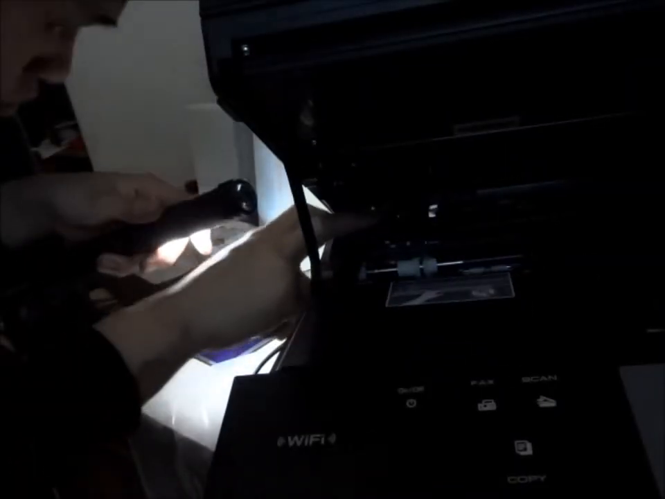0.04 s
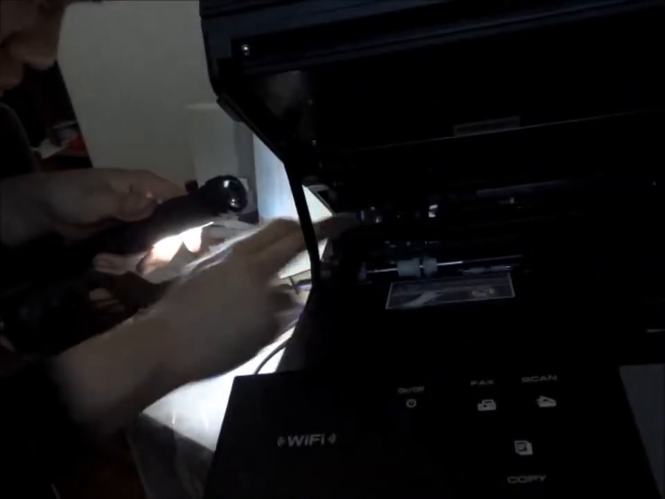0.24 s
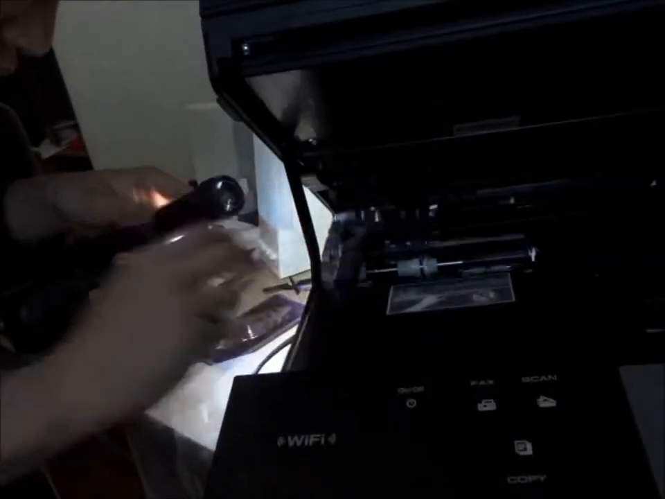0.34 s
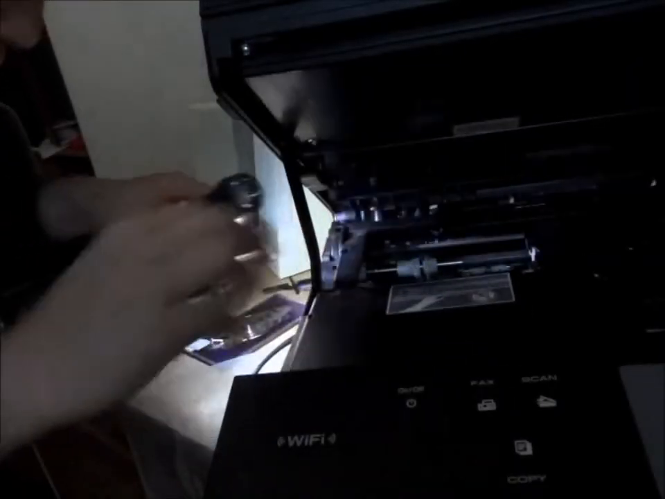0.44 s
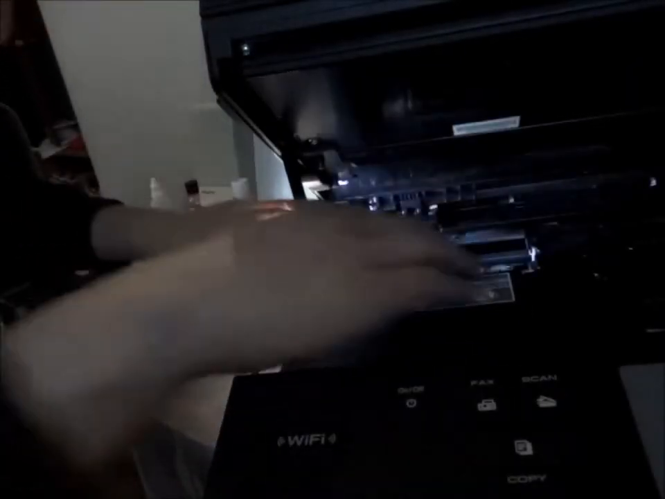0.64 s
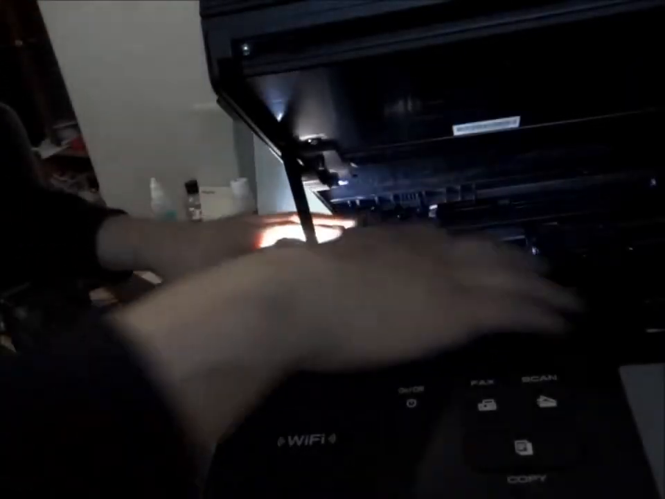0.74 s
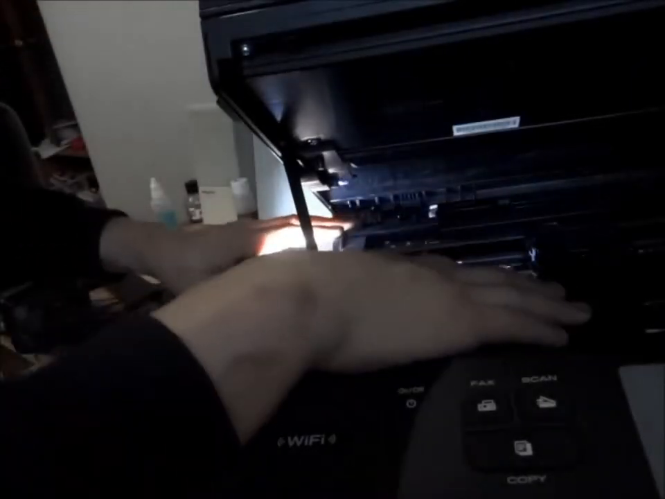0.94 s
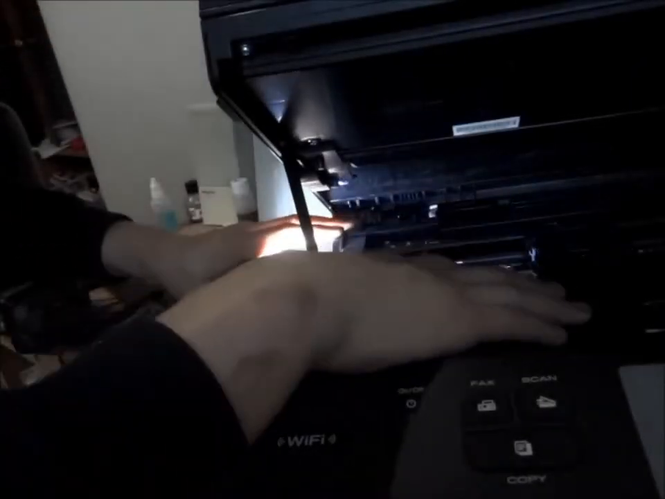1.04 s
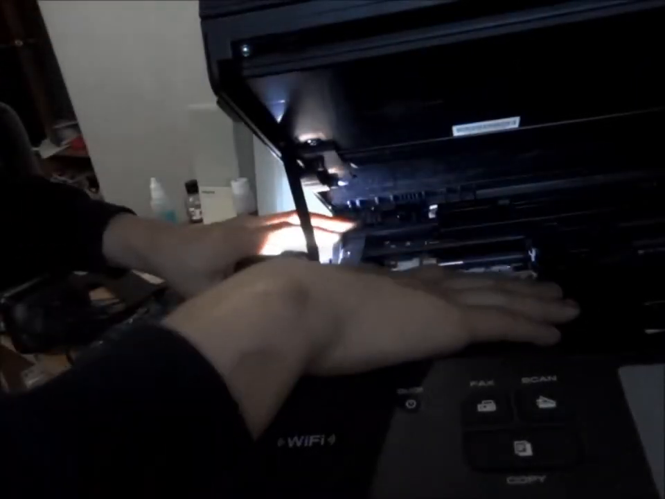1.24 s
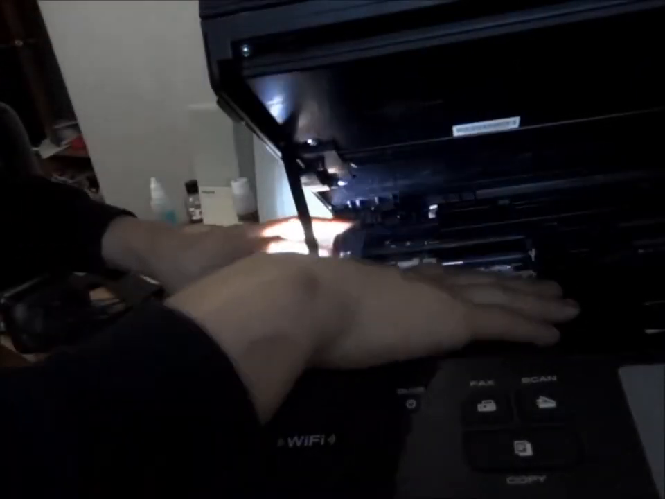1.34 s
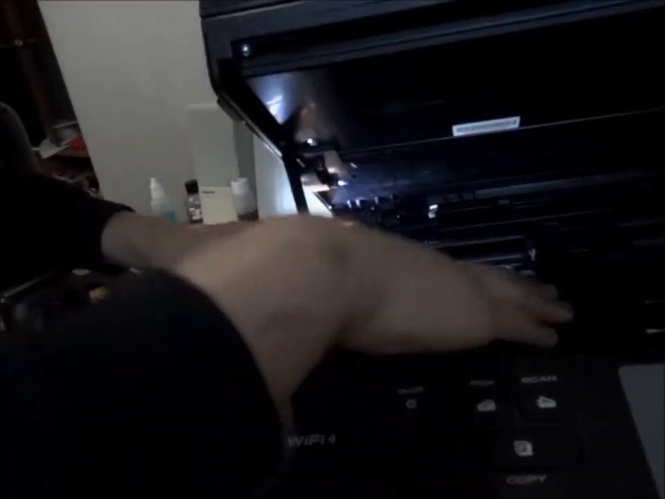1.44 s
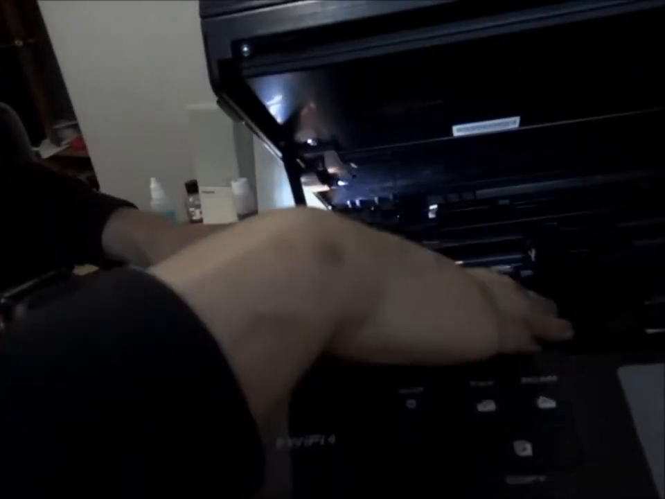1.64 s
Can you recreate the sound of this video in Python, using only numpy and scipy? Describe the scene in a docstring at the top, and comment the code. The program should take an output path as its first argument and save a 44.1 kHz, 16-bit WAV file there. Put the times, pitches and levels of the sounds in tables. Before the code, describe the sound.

Plastic parts clack and rattle as a hand works inside an open printer. A stiff catch snaps sharply, plastic rubs and taps, then a cover knocks shut. The sound is close, in a small quiet room.

```python
"""In a small quiet room, a hand works inside an open plastic printer, close by.
Over a faint low hum, plastic rubs on plastic in tiny slips. Parts tap and rattle,
and each hit rings the hollow housing. A stiff catch snaps home and a pressed panel shudders.
Near the end the cover shuts and a small loose part pings."""
import sys
import numpy as np
from scipy import signal
from scipy.fft import rfft, irfft, next_fast_len
from scipy.io import wavfile
from scipy.ndimage import uniform_filter1d

SR = 44100
rng = np.random.default_rng(int(sys.argv[2]) if len(sys.argv) > 2 else 0)


def generate_wav(sig):
    """Save sig (samples, or channels by samples) to the path in sys.argv[1] as 16-bit PCM at SR."""
    pcm = np.round(np.clip(np.atleast_2d(sig).T, -1, 1) * 32767).astype(np.int16)
    wavfile.write(sys.argv[1], SR, pcm)


N = 74970  # 1.7 s


def amp(db):
    """Turn decibels into a gain."""
    return 10 ** (np.asarray(db) / 20)


def unit(x):
    """Scale each row to an average power of 1."""
    return x / np.sqrt(np.mean(x ** 2, axis=-1, keepdims=True) + 1e-20)


def along(points, hz):
    """Read a curve of (frequency, value) points on a log frequency scale."""
    freqs, values = np.transpose(points)
    return np.interp(np.log(hz + 1), np.log(freqs + 1), values)


def filtered(x, response):
    """Turn each frequency up or down by the gain response(hz)."""
    n = x.shape[-1]
    padded = next_fast_len(n + SR // 4)
    return irfft(rfft(x, padded) * response(np.fft.rfftfreq(padded, 1 / SR)), padded)[..., :n]


def fade(t, ring_s):
    """Die away by 60 dB in ring_s, the ring time."""
    return np.exp(-np.log(1000) * t / np.maximum(ring_s, 1e-3))


def add(track, start_s, sound):
    """Mix a sound into the track at its start time."""
    part = track[max(round(start_s * SR), 0):][:len(sound)]
    part += sound[:len(part)]


# tone of the room's air (frequency [Hz], level [dB])
AIR_TONE = [(20, -14), (45, -5), (95, -3.5), (170, -8.5), (270, 2.5), (420, -10.5), (700, -10),
            (1300, -11.5), (2300, -17), (6000, -23), (11000, -26.5)]
def air_and_hum(hum_hz=99.2):
    """Still air and a faint hum, as mid (what both ears share) and side (how they differ)."""
    noise = rng.standard_normal((2, N))
    air_mid, air_side = amp(-60) * unit(filtered(noise, lambda hz: amp(along(AIR_TONE, hz))))
    hum = amp(-68.5) * np.sqrt(2) * np.sin(2 * np.pi * hum_hz * np.arange(N) / SR)
    return np.array([air_mid + hum, amp(-5) * air_side])


# tone of the plastic parts (frequency [Hz], level [dB])
PLASTIC_TONE = [(40, -53), (70, -13), (120, -9.5), (165, -21.5), (230, 0.5), (440, -2), (680, 0), (880, -3),
                (1030, -4.5), (1240, -1), (1580, -7.5), (1880, -4.5), (2190, -6.5), (2500, -2.5),
                (3150, -7.5), (4900, -10.5), (7000, -15), (11000, -17)]
def plastic_bands(hz, borders_hz=(192, 1180, 3900), lift_db=4, half_width_hz=8.3):
    """Gains of four bands, low to high: thump, knock, clack, tick. The housing lifts its own notes."""
    below = [1 / (1 + (hz / border) ** 8) for border in borders_hz]
    band_power = np.abs(np.diff([np.zeros_like(hz), *below, np.ones_like(hz)], axis=0))
    hollow = sum(1 / (1 + ((hz - note[0]) / half_width_hz) ** 2) for note in HOUSING_NOTES)
    return np.sqrt(band_power) * amp(along(PLASTIC_TONE, hz) + lift_db * hollow)


def plastic_noise():
    """The parts ring at so many pitches that they blur into noise, here in four equally strong bands."""
    return unit(filtered(rng.standard_normal((4, N)), plastic_bands))


def swell(peak_s, rise_s, fall_s):
    """A gain that climbs from -20 dB to full in rise_s and drops back in fall_s."""
    t = np.arange(N) / SR - peak_s
    return 10 ** -((t / np.where(t < 0, rise_s, fall_s)) ** 2)


# sliding strokes (peak time [s], rise [s], fall [s], thump [dB], knock [dB], clack [dB], tick [dB])
STROKES = [(0.011, 0.11, 0.078, -55, -57.5, -63.5, -60.5), (.205, 0.05, 0.062, -52, -62, -59, -52.5),
           (0.307, 0.065, 0.1, -46, -35.5, -58, -45.5), (0.433, 0.031, 0.068, -53, -49, -58, -67),
           (0.686, 0.04, 0.086, -66, -48.5, -46, -46.5), (0.776, 0.039, 0.066, -47.5, -43, -47, -45),
           (.842, 0.041, 0.11, -53, -48.5, -48.5, -50.5), (1.02, 0.39, 0.22, -59, -57.5, -64.5, -65),
           (1.205, 0.043, 0.034, -56.5, -46, -46.5, -53), (1.27, 0.094, 0.027, -51, -80, -57.5, -54.5),
           (1.35, 0.063, 0.026, -65, -41, -49.5, -63), (1.457, 0.17, 0.16, -77, -55, -51.5, -46.5),
           (1.64, 0.074, 0.13, -61, -57, -70, -93)]
def sliding(slips_per_s=500, slip_s=0.0042, slip_share=0.71):
    """Plastic rubs on plastic: swells of friction, made rough by tiny slips."""
    power = sum((amp(levels)[:, None] * swell(peak_s, rise_s, fall_s)) ** 2
                for peak_s, rise_s, fall_s, *levels in STROKES)
    slips = (rng.random(N) < slips_per_s / SR) * rng.exponential(size=N)
    grain = signal.lfilter([1], [1, -np.exp(-1 / (slip_s * SR))], slips)  # each slip dies away
    roughness = 1 - slip_share + slip_share * grain / grain.mean()
    return np.sum(plastic_noise() * np.sqrt(power * roughness), axis=0)


def burst(noise, shape, even_hz=450):
    """Shaped noise, evened out: a blow stirs all pitches alike, so only the plastic sets the tone."""
    n = shape.shape[-1]
    hz = np.fft.rfftfreq(n, 1 / SR)

    def smooth_power(spectrum):
        return np.abs(uniform_filter1d(np.abs(spectrum) ** 2, int(even_hz / hz[1]) + 1)) + 1e-12

    gain = np.sqrt(smooth_power(plastic_bands(hz)) / smooth_power(rfft(noise * shape)))
    even = irfft(rfft(noise) * gain, n)
    return unit(even * shape) * np.sqrt(np.mean(shape ** 2, axis=1, keepdims=True))


def ring(t, notes, attack_s):
    """A part struck at a random spot rings with fading notes, a little different each time."""
    tones = sum(amp(db + rng.normal(0, 1.1)) * fade(t, ring_s)
                * np.sin(2 * np.pi * (hz * t + rng.random())) for hz, db, ring_s in notes)
    return tones * (1 - np.exp(-t / attack_s))


def strike(hits, body_notes, clack_from_hz=1180):
    """Each hit is a burst of noise whose highs die first, plus the notes of the struck body."""
    out, t = np.zeros(N), np.arange(SR // 4) / SR
    noise = plastic_noise()
    band_ring_s = np.c_[[0.23, 0.059, 0.051, 0.03]]  # thump, knock, clack, tick
    band_slowness = np.c_[[4.3, 0.49, 0.32, 0.35]]  # the low bands start more slowly
    for start_s, knock, clack, tick, stretch, attack_s in hits:
        shape = (1 - np.exp(-t / (attack_s * band_slowness))) * fade(t, stretch * band_ring_s)
        shape /= shape.max(axis=1, keepdims=True)
        offset = rng.integers(N - len(t))
        bands = burst(noise[:, offset:offset + len(t)], shape)
        notes = [(hz, db + (knock if hz < clack_from_hz else clack), ring_s)
                 for hz, db, ring_s in body_notes]
        thump = knock - 38  # dB
        add(out, start_s, amp([thump, knock, clack, tick]) @ bands + ring(t, notes, attack_s))
    return out


# parts hitting (time [s], knock [dB], clack [dB], tick [dB], ring stretch [factor], base attack [s])
TAPS = [(0.019, -58.5, -49.5, -45.5, 2.74, 0.00022), (0.127, -48, -60, -54, 0.44, 0.0042),
        (.140, -44, -51.5, -51, 1.17, 0.00021), (.177, -46.5, -48, -72, 0.62, 0.0013),
        (0.187, -50, -51.5, -56, 1.8, 0.0011), (.242, -47, -44, -35.5, 0.96, 0.0014),
        (0.2472, -34.5, -28.5, -25, 1.7, 0.00098), (0.255, -29.5, -43, -42, 1.56, 0.00063),
        (0.2738, -37, -34, -28, 1.8, 0.0029), (.2868, -27.5, -23.5, -28.5, 0.94, 0.00089),
        (.2957, -35, -41.5, -25.5, 1.55, 0.00058), (.303, -28.5, -31, -42, 0.95, 0.00033),
        (0.3082, -33, -36, -30, 0.88, 0.00071), (.319, -30.5, -38, -31, 1.1, 0.00061),
        (.3245, -53, -35, -35, 1, 0.0011), (0.3593, -44, -30.5, -34.5, 1.3, 0.0017),
        (.370, -38, -35.5, -41, 0.61, 0.00049), (.438, -52, -46.5, -54, 1.1, 0.0016),
        (0.618, -84, -66, -51.5, 3.9, 0.0016), (.721, -41.5, -39.5, -37.5, 1.9, 0.0074),
        (.742, -37.5, -44.5, -62, 0.76, 0.0035), (0.7662, -39, -38, -30.5, 0.86, 0.0055),
        (.800, -43.5, -38, -39, 1.4, 0.012), (0.874, -46.5, -48, -42.5, 1.3, 0.0036),
        (0.881, -40, -39, -31, 0.8, 0.00089), (.8838, -50, -39, -28.5, 0.9, 0.00091),
        (.889, -48, -63, -39.5, 2, 0.0015), (.955, -43.5, -42, -40.5, 1.57, 0.002),
        (.982, -40.5, -56, -63, 0.53, 0.0034), (1.048, -79, -48.5, -44, 1.46, 0.0012),
        (1.126, -39.5, -45.5, -53, 1.43, 0.0073), (1.152, -45, -49, -59, 0.51, 0.00047),
        (1.205, -42, -54, -40.5, 0.75, 0.0011), (1.221, -44, -49, -61, 1.8, 0.0017),
        (1.297, -45, -54, -70, 2.3, 0.0044), (1.308, -37, -40.5, -50.5, 1.2, 0.0028),
        (1.347, -45, -68, -53, 2.3, 0.0021), (1.459, -45, -75, -55, 1.5, 0.0025),
        (1.5235, -39, -50, -63, 0.66, 0.0007), (1.558, -43.5, -54, -62, 0.74, 0.0024),
        (1.6075, -72, -52, -57, 0.44, .0004), (1.621, -52, -48.5, -66.5, 1.4, 0.0044)]
# notes the housing rings at (pitch [Hz], level against the hit [dB], ring time [s])
HOUSING_NOTES = [(222.3, -22.5, 0.2), (358.5, -15.5, 0.23), (521.7, -15.5, 0.23), (629, -26, 0.17),
                 (677, -5.5, 0.098), (785, -21, 0.13), (1014, -6, 0.066), (1227.6, -4.5, 0.089),
                 (1914, -14, 0.065), (2476, -3, 0.052), (2737, 0, 0.032), (3530, -5.5, 0.041)]
def tapping():
    """Parts tap and rattle, ringing the hollow housing."""
    return strike(TAPS, HOUSING_NOTES)


# the catch slips, then snaps home (time [s], level [dB])
CRACKS = [(0.65, -31.5), (.6541, -19)]
# tone of a crack (frequency [Hz], level [dB])
CRACK_TONE = [(380, -36), (540, -2), (1000, -17), (1300, -0.5), (2000, -8), (2650, 0.5), (3800, -6.5),
              (4800, 1), (7500, -9.5), (11000, -5)]
# notes the catch rings at (pitch [Hz], level [dB], ring time [s])
CATCH_NOTES = [(537, -36, 0.14), (985, -34, 0.1), (1298, -30, 0.1), (2626, -24, 0.042),
               (3240, -30.5, 0.054), (4660, -37, 0.1), (5180, -40, 0.074), (6580, -36.5, 0.13)]
def catch_snap(attack_s=0.0002, low_cut_hz=460):
    """A stiff catch, too small for bass, cracks twice; the second starts with a spike and rings on."""
    out, t = np.zeros(N), np.arange(SR // 3) / SR
    shape = fade(t, ring_s=0.045) * (1 - np.exp(-t / attack_s))
    for start_s, db in CRACKS:
        crack = unit(filtered(rng.standard_normal(len(t)), lambda hz: amp(along(CRACK_TONE, hz))))
        add(out, start_s, amp(db) * crack * shape)
    bright_noise = np.diff(rng.standard_normal(len(t) + 1))
    spike = amp(-19) * bright_noise * fade(t, ring_s=0.0086)
    add(out, CRACKS[-1][0], spike + ring(t, CATCH_NOTES, attack_s=0.0028))
    return signal.sosfilt(signal.butter(4, low_cut_hz, "highpass", fs=SR, output="sos"), out)


# low notes of a panel (pitch [Hz], half width [Hz], relative level [dB])
PANEL_NOTES = [(132.5, 8.1, -3), (316, 59, -12)]
def panel_shudder():
    """A panel shudders at its low notes as the hand presses on it."""
    def response(hz):
        return sum(amp(db) / (1 + ((hz - pitch) / width) ** 2) for pitch, width, db in PANEL_NOTES)

    press = swell(peak_s=0.845, rise_s=0.075, fall_s=0.09)
    drone = filtered(rng.standard_normal(N), response)
    return amp(-43) * unit(drone * press) * np.sqrt(np.mean(press ** 2))


# cover hits (time [s], knock [dB], clack [dB], tick [dB], ring stretch [factor], base attack [s])
COVER_HITS = [(1.3628, -27.5, -23.5, -25, 0.92, 0.0038), (1.3705, -31.5, -40, -46, 2.7, 0.0021)]
# notes the cover rings at (pitch [Hz], level against the hit [dB], ring time [s])
COVER_NOTES = [(260, -9, 0.11), (434, -28, 0.14), (626, -3, 0.09), (670, -10.5, 0.24), (981.4, -2, 0.12),
               (2770, -12, 0.037), (4140, -13, 0.059)]
def cover_shut():
    """The cover shuts and settles, ringing with both hits."""
    return strike(COVER_HITS, COVER_NOTES)


# notes of a small loose part (pitch [Hz], level [dB], ring time [s])
PING_NOTES = [(1350, -37.5, 0.026), (1750, -36, 0.033)]
def loose_part_ping(start_s=1.63):
    """A small loose part pings softly."""
    out = np.zeros(N)
    add(out, start_s, ring(np.arange(SR // 4) / SR, PING_NOTES, attack_s=0.00096))
    return out


# how long the room echoes (frequency [Hz], ring time [s])
ECHO_TIMES = [(150, 0.84), (1000, 0.32), (4000, 0.33), (10000, 0.27)]
def room_echo(x, build_s=0.0055):
    """The small room answers with a short echo that lasts longest in the bass."""
    hz, t, spectrum = signal.stft(rng.standard_normal(SR // 2), SR, nperseg=256)
    shape = fade(t, along(ECHO_TIMES, hz)[:, None]) * (1 - np.exp(-t / build_s))
    _, tail = signal.istft(spectrum * shape, SR)
    return signal.fftconvolve(x, tail / np.linalg.norm(tail))[:N]


# stereo width of the direct sound (frequency [Hz], side against mid [dB])
DIRECT_WIDTH = [(60, -32), (250, -25), (1000, -16.5), (4000, -15), (10000, -13)]
def near_bounces(x):
    """The side signal: sound off near surfaces reaches left and right slightly out of step."""
    def difference(hz):
        t = np.arange(2 * len(hz) - 2) / SR
        bounces = rfft(rng.standard_normal(len(t)) * fade(t, ring_s=0.03))
        return amp(along(DIRECT_WIDTH, hz)) * np.exp(1j * np.angle(bounces))

    return filtered(x, difference)


# stereo width of the echo (frequency [Hz], side against mid [dB])
ECHO_WIDTH = [(60, -29), (250, -20.5), (1000, -5), (4000, -9.5), (10000, -6.5)]
# slight lean to the right, which gets the opposite gain (frequency [Hz], left gain [dB])
BALANCE = [(400, 0), (1200, -0.46), (4000, -0.3)]
def scene():
    """The printer, nearly centred, in a room whose echo spreads wider."""
    printer = sliding() + tapping() + catch_snap() + panel_shudder() + cover_shut() + loose_part_ping()
    direct = np.array([printer, near_bounces(printer)])
    echo_mid = room_echo(printer)
    echo_side = filtered(room_echo(printer), lambda hz: amp(along(ECHO_WIDTH, hz)))
    mid, side = air_and_hum() + direct + amp(-14) * np.array([echo_mid, echo_side])
    left_right = np.array([mid + side, mid - side])
    return filtered(left_right, lambda hz: amp(np.outer([1, -1], along(BALANCE, hz))))


def record(dry, top_hz=11000):
    """Cut away the highest treble, above top_hz."""
    return filtered(dry, lambda hz: 1 / np.sqrt(1 + (hz / top_hz) ** 160))


dry = scene()
out = record(dry)
generate_wav(out)
```